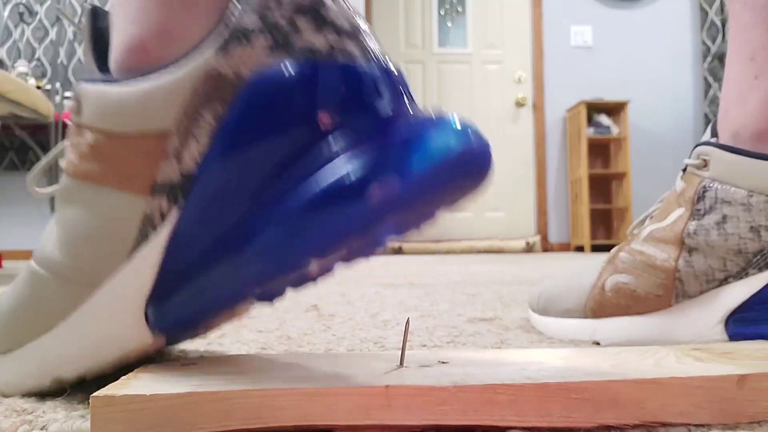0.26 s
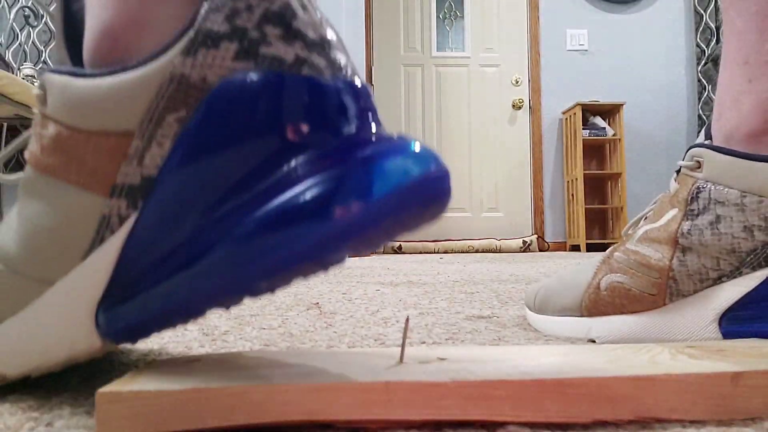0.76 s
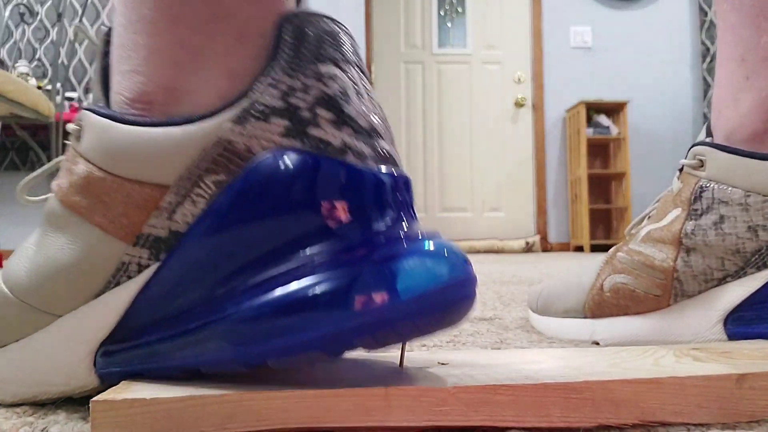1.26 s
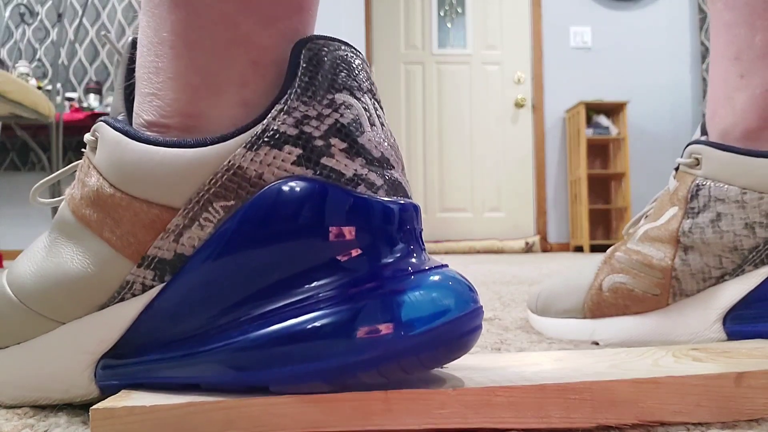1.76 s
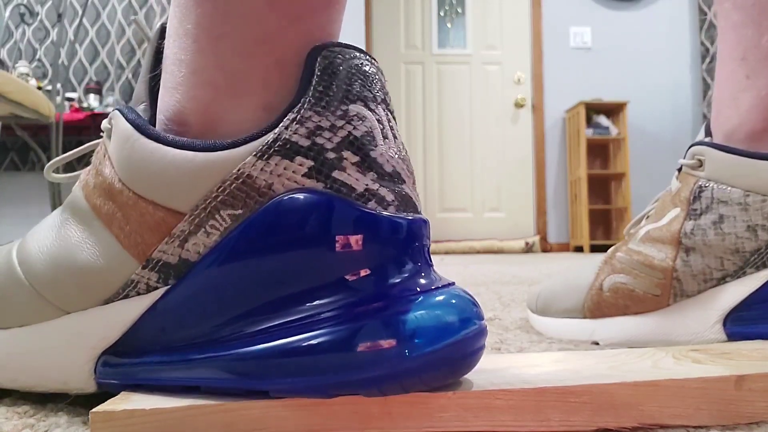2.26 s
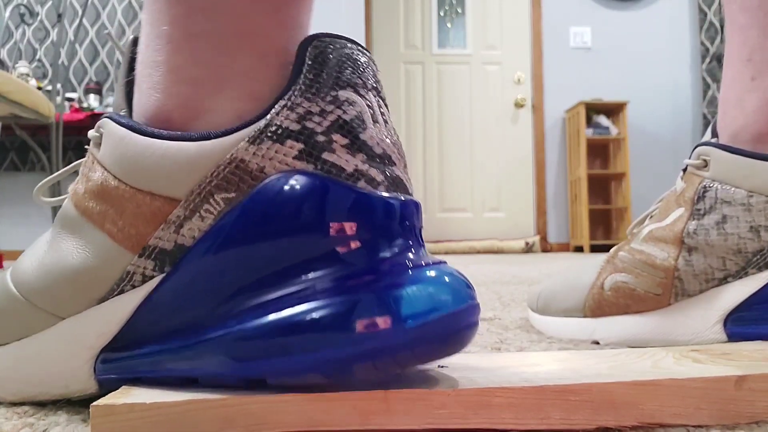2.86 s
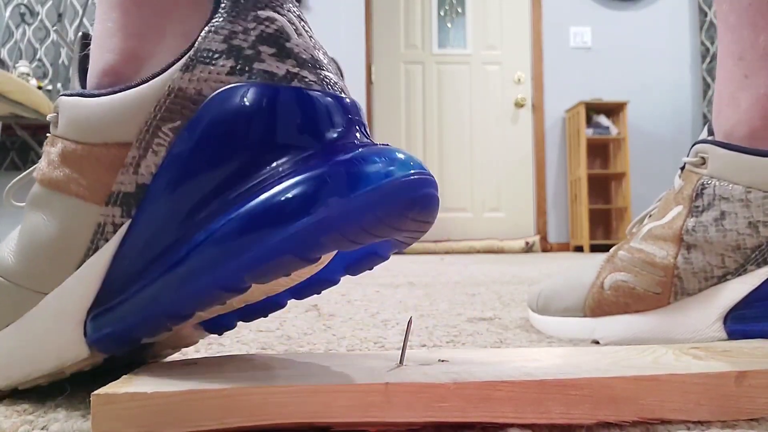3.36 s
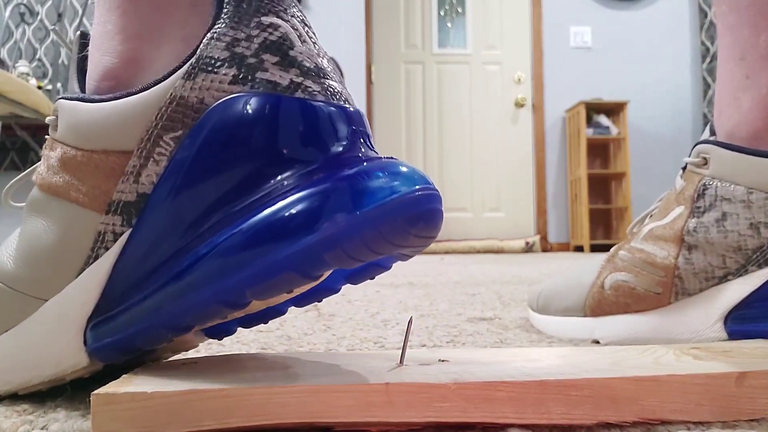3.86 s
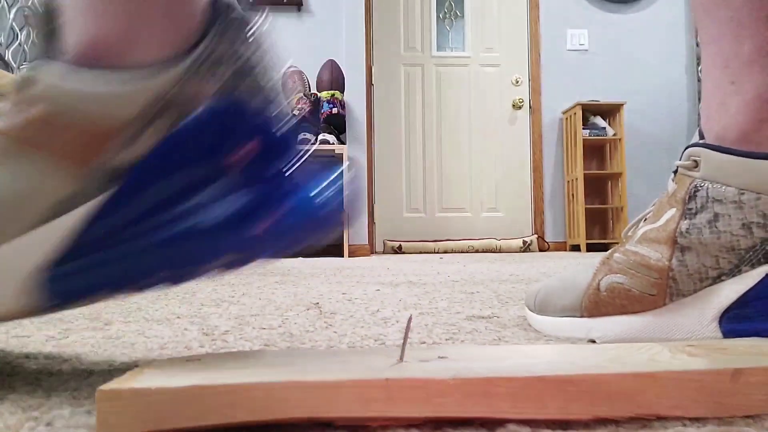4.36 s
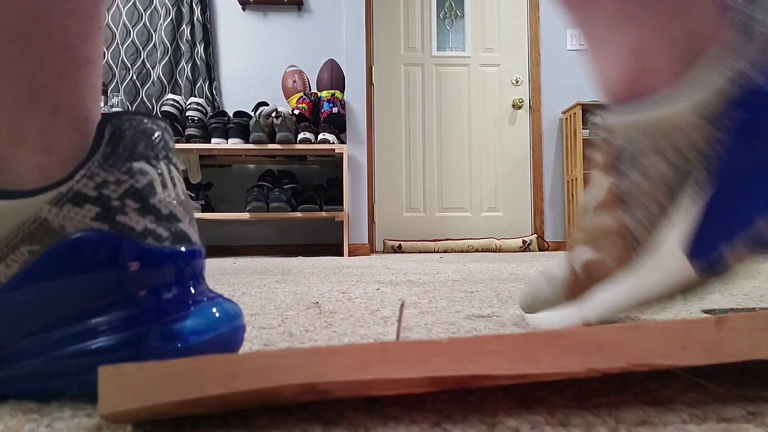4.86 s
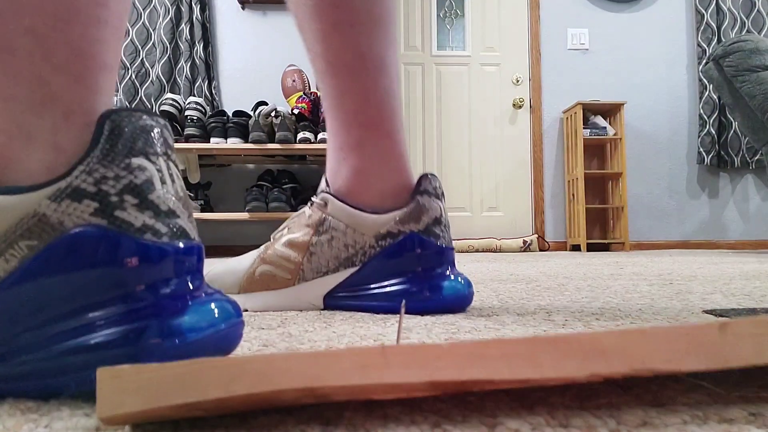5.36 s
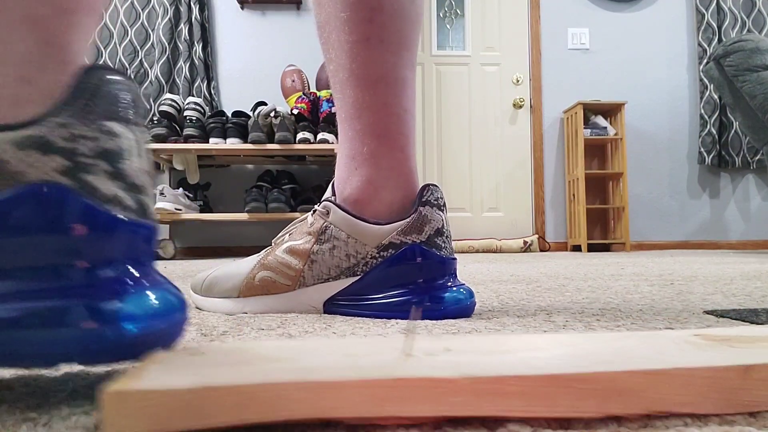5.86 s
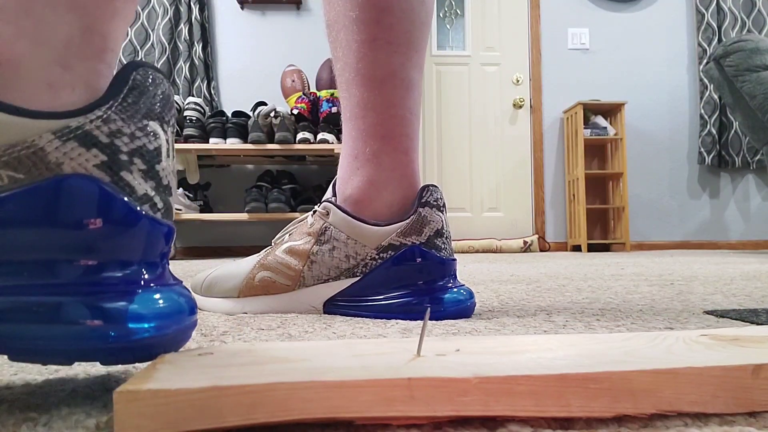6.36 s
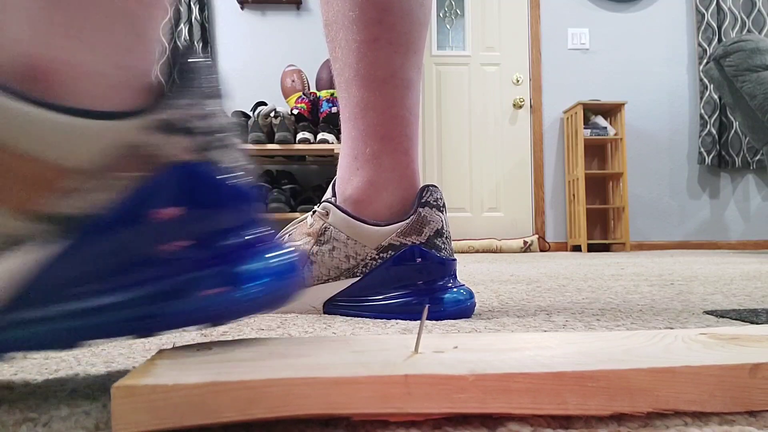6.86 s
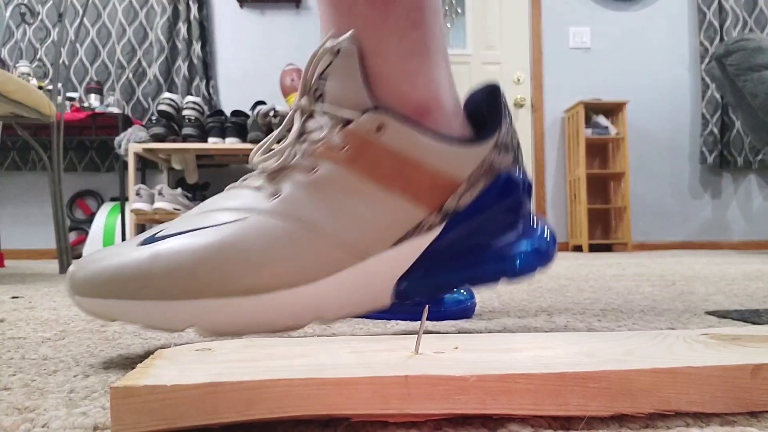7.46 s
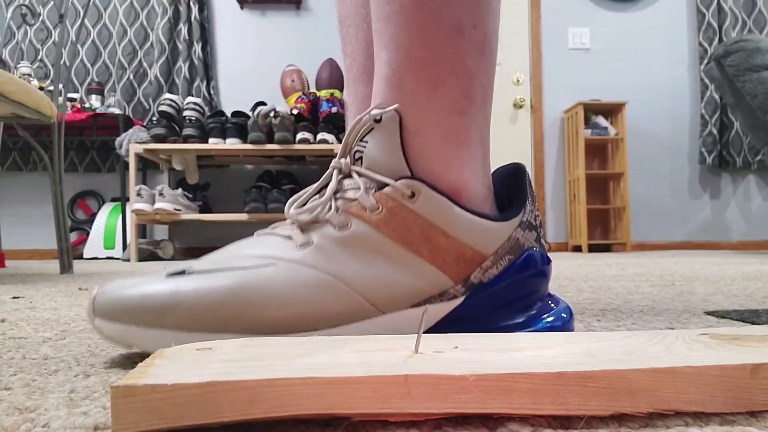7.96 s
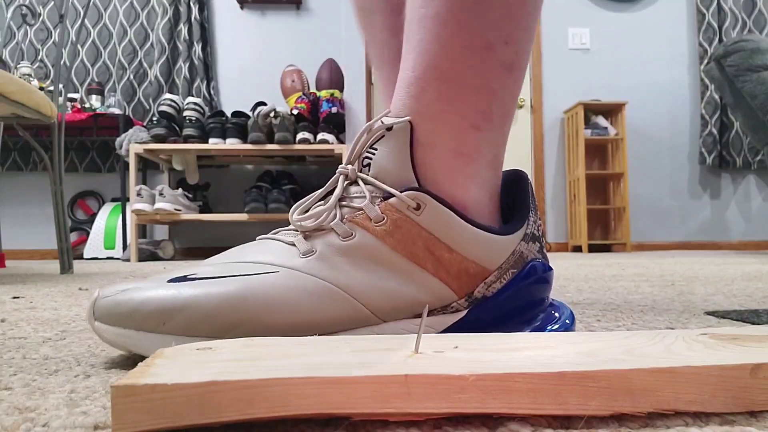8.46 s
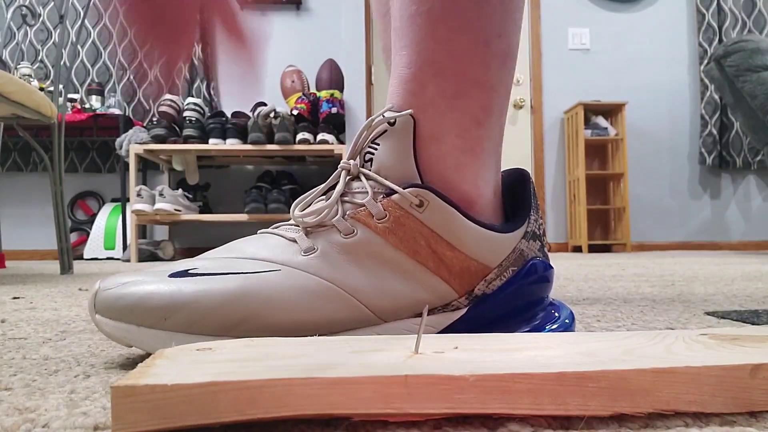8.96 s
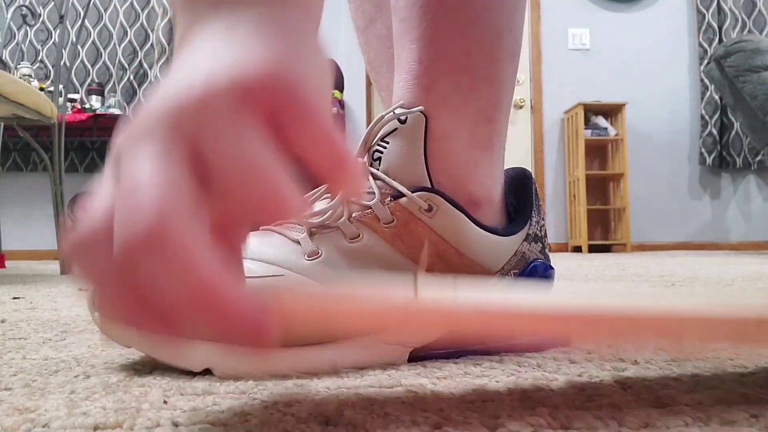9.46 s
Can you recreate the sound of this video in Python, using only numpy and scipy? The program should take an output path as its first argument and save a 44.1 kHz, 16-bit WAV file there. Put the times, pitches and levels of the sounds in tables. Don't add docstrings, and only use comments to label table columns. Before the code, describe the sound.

Soft heel thumps and faint rubber brushing, then a sudden dry wood crack with a brief flutter of air. After a lull, clustered knocks, tread ticks and grainy carpet scrapes mark several steps, with dull floor booms beneath. Isolated taps lead to a final, sharper crack and a tumbling burst of clacks. Stereo phone microphone a hand's width away, in a short-echo room with low hiss.

```python
import sys
import numpy as np
from scipy import signal
from scipy.fft import rfft, irfft, next_fast_len
from scipy.io import wavfile
from scipy.ndimage import uniform_filter1d

SR = 44100
rng = np.random.default_rng(int(sys.argv[2]) if len(sys.argv) > 2 else 0)


def gain_from_db(level_db):
    decades = np.asarray(level_db, float) / 20
    return 10 ** decades


def wrap_up_sound(samples):
    columns = np.atleast_2d(samples).T
    tamed = np.clip(columns, -1, 1)
    steps = np.round(tamed * 32767).astype(np.int16)
    wavfile.write(sys.argv[1], SR, steps)


N = 428652

# time in [s], blow in [dB], floor thud in [dB], pan in [dB].
HEEL_THUMPS = [
    (.47, -58, 18, 18),
    (1.027, -72, 27, -6),
    (1.36, -70, 12.5, 7),
    (3.058, -44, -4, 4.5),
    (4.368, -49, -5, 15),
    (5.584, -41.5, -5.5, -27),
    (7.823, -58, -13, -0.5),
    (8.289, -65.5, 12.5, -3),
    (9.308, -55, -11, -1),
]
# time in [s], blow in [dB], board ring in [Hz], floor thud in [dB], pan in [dB].
TOE_TAPS = [(4.726, -40.5, 366, 3, 11.5), (4.776, -47.5, 350, -2.5, 6), (5.038, -59, 866, 2, -1.5),
            (5.222, -42.5, 498, -7.5, 5), (5.455, -52, 612, 5.5, 6), (5.572, -41, 497, 3, 17),
            (5.89, -39, 426, -5, 5), (8.039, -33.5, 355.4, -14.5, 4.5), (8.733, -39.5, 430, -8.5, 5),
            (8.949, -39.5, 361, -14.5, -4), (9.16, -41, 444, -6, 4)]
# time in [s], blow in [dB], board ring in [Hz],
# hardness in [dB], pan in [dB].
EDGE_CLACKS = [(.493, -55.5, 920, -5, 19), (0.313, -53.5, 425, 2.5, 6), (3.073, -50.5, 435, -8, 18),
               (3.091, -66, 420, 10, 6), (4.615, -51, 394, 0, 10.5), (4.759, -60, 600, 1, 13),
               (4.795, -56, 615, -9, 10), (4.822, -42.5, 370, -22, 4.5), (4.892, -49.5, 810, -14, 5),
               (4.929, -57, 691, -6, -3), (5.564, -62, 878, -14, 10), (5.6878, -51, 595, 2, 9),
               (5.721, -63, 894, -17.5, 8), (5.988, -42.5, 408.4, -18, -1), (9.397, -49.5, 418, 2, 10),
               (9.456, -42, 517, -15, 3), (5.489, -52, 570, -9, 10.5), (5.597, -37.5, 580, -7, 12),
               (5.611, -39.5, 340, -6, 2), (5.683, -42, 350, -22, 15), (6.274, -74, 896, 5, 3.5),
               (6.292, -69, 900, 5, 3), (6.301, -66, 790, 7, 6.5), (6.329, -59, 960, 4.5, 8),
               (6.364, -61, 830, -11.5, -0.5), (6.405, -67.5, 902, 5, 9), (6.756, -67, 700, 6.5, 9),
               (6.778, -66.5, 720, 5, 15.5), (6.788, -58.5, 813, 0, 7), (.447, -59, 400, -10, 10),
               (6.799, -48.5, 506, -6, 5), (9.464, -35.5, 614.5, -25, 3), (9.474, -27.5, 326, -9, 1.5),
               (9.479, -27, 622, -2.5, 5.5), (9.491, -30, 544, -3, 1), (9.513, -32.5, 516, -1, -1),
               (9.612, -48.5, 360, -3, 2)]
# pitch in [Hz], level in [dB], t60 in [s].
CONTACT_MODES = [(1392, -2.5, 0.0056), (1648, -0.5, 0.011), (2220, 9, 0.0035), (2830, -7.5, 0.013),
                 (3480, -12.5, 0.009)]
# pitch in [Hz], level in [dB], t60 in [s].
FLOOR_MODES = [(122.2, -4.5, 0.19), (177.4, 2, 0.079), (267.6, 3, 0.031)]
# time in [s], peak in [dB], contact in [ms], pan in [dB].
BOARD_CRACKS = [
    (2.1791, -9.5, 2.01, 7),
    (3.101, -25, 1.32, 9.5),
    (4.855, -17.5, 1, 6.5),
    (9.2007, -1.5, 0.878, 5),
]
# pitch in [Hz], level in [dB], t60 in [s].
HEEL_CRACK_MODES = [(120, -29, 0.067), (178, -15, 0.098), (334, -21, 0.019), (560, -11.5, .015),
                    (930, 7.5, 0.0046), (1325, -1, 0.0084), (1680, -7, 0.0077), (3000, -15, 0.006),
                    (3300, -17.5, 0.0095), (4308, -26.5, .008)]
LIFT_CRACK_MODES = [(115, -12, 0.057), (207, -14.5, 0.053), (330, 7, 0.013), (681, 0.5, 0.009),
                    (1105, -12.5, 0.01), (1530, 4.5, 0.0068), (2280, -6, 0.0058), (3250, -16, 0.023)]
TIP_CRACK_MODES = [(178, -20.5, 0.15), (388, 9, 0.012), (1630, -3, 0.016), (2110, -12.5, 0.034),
                   (2800, 0, 0.0093), (3050, 2, 0.018), (4860, -6.5, 0.009), (5850, -17, 0.004)]
GRAB_CRACK_MODES = [(72.7, -34, 0.15), (135.6, -31, 0.14), (216, -14, 0.023), (350, -0.5, 0.0084),
                    (641, 5, 0.0058), (1022, 2.5, 0.0044), (1487, -2, 0.0038), (2205, -5.5, 0.0035),
                    (2510, -31.5, 0.02), (2900, -28, 0.013)]
# time in [s], peak in [dB], pan in [dB].
TREAD_TICKS = [(2.9282, -67, 13.5), (5.5406, -54, 13.5), (5.5634, -55.5, 22.5), (5.63, -49.5, 8.5),
               (5.964, -51, 0), (5.9912, -48, 1.5), (6.3292, -50, 0), (6.789, -55.5, 1.5),
               (9.4588, -43.5, 2), (9.4664, -52, 4), (9.4705, -52, 4), (5.9492, -57, 0)]
# time in [s], peak in [dB], lower treble in [dB], pan in [dB].
TREAD_SNAPS = [(.3142, -60, -0.5, 12), (2.1797, -29.5, -2.5, 7), (3.0746, -43.5, -7.5, 17),
               (3.102, -39.5, -4.5, 12), (4.8445, -38, -4, 2.5), (4.8558, -22.5, -3, 10),
               (9.6223, -62, -24, -2), (5.5834, -38, -8.5, 7.5), (5.5963, -44.5, 4, 13.5),
               (5.6105, -50, 7.5, 5), (8.8334, -84, 6, 6.5), (9.2006, -36.5, 6.5, 10),
               (9.3227, -49, -20, 0), (9.4914, -29.5, -4, 5.5), (5.6875, -59.5, -12, 8.5),
               (9.4805, -25.5, -35, -0.5), (9.4751, -32, -13, 6), (9.5127, -30, -8, -3)]
# time in [s], peak in [dB], pitch in [Hz], t60 in [s], pan in [dB].
FLOOR_STOMPS = [(2.183, -20, 260, 0.013, 9), (2.206, -36.5, 330, 0.087, 0), (4.731, -31.5, 120, 0.08, -2.5),
                (4.749, -31.5, 116, 0.031, -5), (5.5834, -25, 94, 0.05, -5.5), (5.594, -24, 85, 0.057, -8),
                (5.608, -32, 60, 0.1, 2), (6.806, -37.5, 60, 0.098, -0.5), (6.821, -37.5, 75, .08, -0.5),
                (.499, -34, 84, 0.22, 8.5), (.524, -43, 83.5, 0.05, -5), (2.191, -36, 149.2, .13, 2.5),
                (8.043, -41, 149, 0.082, 4), (9.203, -31.5, 63.4, .15, -5), (9.221, -36.5, 114.5, .1, 1),
                (5.343, -43.5, 74.9, 0.066, -1)]
# start in [s], rise in [ms], fall in [ms], scrape in [dB], pile fizz in [dB].
SOLE_DRAGS = [(.3, 8.7, 410, -77, -81.5), (.45, 24, 160, -79, -80), (1.83, 23, 550, -84.5, -85.5),
              (2.18, 34, 97, -54.5, -69), (2.82, 41, 85, -81, -78), (3.1, 12.5, 83, -63, -71.5),
              (4.27, 97, 97, -67, -74), (4.72, 134, 23, -60, -69.5), (4.855, 12, 162, -60.5, -66),
              (4.998, 36.6, 68, -74.5, -89.5), (5.543, 46.5, 138, -53, -60.5), (5.66, 12, 41, -72, -78),
              (5.923, 42, 74, -53, -59.5), (6.24, 60, 187, -69.5, -71.5), (6.735, 43, 43, -66.5, -79.5),
              (6.783, 8.5, 84, -58, -68), (7.479, 44, 84, -101.5, -74.5), (7.98, 63, 110, -74.5, -71.5),
              (8.95, 54, 120, -78, -88), (9.2, 10, 163, -52, -71), (9.29, 56, 71, -59.5, -67),
              (9.38, 11, 146, -66.5, -99), (9.437, 48, 109, -45.5, -51.5), (9.58, 47, 170, -73, -81)]
# start in [s], rise in [ms], fall in [ms], level in [dB], centre in [Hz], width in [Hz].
BAND_SWISHES = [(0.46, 21, 62, -66.5, 1000, 780), (0.87, 21.3, 130, -74, 380, 340),
                (4.65, 4.5, 11.4, -71.5, 1100, 900), (4.6, 28, 320, -76, 1900, 1100),
                (4.69, 25, 50, -70, 2230, 830), (4.81, 8, 14.5, -55, 1100, 500),
                (4.842, 4, 9.4, -51, 2400, 900), (4.858, 14, 78, -55.5, 2900, 870),
                (4.875, 13, 60, -62, 5100, 1200), (5.224, 8, 42.4, -70, 620, 700),
                (5.89, 8.3, 59, -68, 680, 696), (7.48, 45, 42, -71.5, 5700, 1207),
                (8.041, 5.5, 160, -66.5, 710, 800), (8.737, 6.5, 74, -73, 848, 900),
                (8.831, 3.1, 9.1, -74, 3200, 2100), (4.614, 4.5, 10, -61.5, 1970, 1300),
                (8.825, 9, 98, -79, 3270, 1500), (8.98, 11.7, 87, -80.5, 4000, 2000),
                (8.951, 5.3, 45, -70.5, 800, 804), (9.205, 7.5, 110, -64, 2720, 700),
                (9.31, 25, 110, -62, 3100, 500), (9.315, 16, 110, -65, 4400, 780),
                (9.657, 4, 10, -68, 8600, 2500), (6.314, 4, 10, -70, 7300, 900),
                (5.6, 80, 90, -74.5, 5800, 2700), (5.94, 15, 60, -61, 4900, 1200),
                (2.21, 20, 70, -63, 4900, 2000), (9.204, 5, 25, -54.5, 2700, 900),
                (9.388, 10, 11, -55, 3280, 1700)]
# start in [s], rise in [ms], fall in [ms], # level in [dB], flutter
# (spacing of the bands) in [Hz].
CRACK_WAKES = [
    (2.182, 25, 95, -51.5, 970),
    (3.103, 8.8, 105, -63, 1420),
]
# time in [s], effort in [dB], pan in [dB].
RUSTLE_EFFORT = [(0.0, -92, 1), (0.38, -90.5, 12), (1.8, -86.5, 11.5), (2.08, -84.5, 20.5), (2.4, -95, 8),
                 (3.03, -87, 22), (4.14, -91, 0), (4.84, -72, 9.5), (5.17, -88, 6.5), (7.88, -88, 4),
                 (8.01, -79.5, 14), (8.55, -88.5, 3), (9.3, -72.5, 7), (9.72, -79.5, -0.5)]
# frequency in [Hz], density in [dB per Hz].
ROCK_COLOUR = [(59, -30.5), (100, -2), (183, -6), (237, -2), (295, -10.5), (323, -14), (700, -28),
               (910, -59), (1540, -120)]
SCRAPE_COLOUR = [(260, -30), (450, 0.5), (712, -7), (827, -5), (1110, -9), (1240, -8.5), (2640, -13.5),
                 (3030, -13.5), (7000, -27.5), (9100, -56), (15400, -120)]
FIZZ_COLOUR = [(3820, -41.5), (6500, -15), (7460, -27.5), (8140, -12.5), (10500, -8), (14100, -2.5),
               (15000, -5), (15500, -47.5)]
WAKE_COLOUR = [(300, -11.5), (800, -1), (1800, -8), (2400, -11.5), (3200, -4), (5200, -11), (7800, -20),
               (11000, -18)]
# time in [s], load in [dB], then build-up in [ms] and
# settling in [ms] for a change of 20 dB.
WEIGHT_SHIFTS = [(.4, -53.5, 190, 120), (.51, -42.5, 57, 140), (1.05, -59, 560, 240), (1.38, -57.5, 25, 88),
                 (1.69, -59, 210, 900), (2.192, -49, 25, 230), (2.62, -61, 230, 300), (2.95, -56, 98, 240),
                 (3.11, -51.5, 166, 280), (4.22, -61, 225, 720), (4.39, -51.5, 106, 94),
                 (4.735, -46, 75, 62), (4.841, -46, 30, 210), (5.25, -52.5, 140, 70),
                 (5.36, -53.5, 82, 1170), (5.6, -37.5, 29, 52), (5.929, -37.5, 26, 74),
                 (6.01, -56.5, 51, 50), (6.84, -44, 42, 94), (6.98, -59.5, 124, 166), (7.31, -62, 65, 180),
                 (7.6, -63.5, 49.5, 225), (7.85, -54.5, 110, 62), (8.04, -47.5, 132, 200),
                 (8.28, -53.5, 285, 127), (8.74, -54.5, 222, 160), (8.961, -53, 45, 90),
                 (9.21, -32, 24, 89), (9.34, -46, 51, 40), (9.5, -35, 52, 30)]
# time in [s], pan in [dB].
WEIGHT_LEAN = [(0.0, -14), (0.43, -1), (1.92, -1), (2.06, -6), (2.17, 8.5), (2.49, -2.5), (4.87, 0.5),
               (7.93, -6.5), (8.23, 2.5), (8.44, -6.5), (9.12, 0.5), (9.72, -1)]
# frequency in [Hz], t60 in [s].
ROOM_T60 = [(100, 0.64), (300, 0.33), (1000, 0.12), (3000, 0.1), (8000, 0.027), (14000, 0.068)]
# frequency in [Hz], correlation in [0 to 1].
PORT_LIKENESS = [(60, 0.87), (180, 0.44), (550, 0.36), (1650, 0.02), (15000, 0.04)]
# frequency in [Hz], left lead in [radians].
PORT_PHASE = [(20, 0), (65, -.3), (125, .65), (250, .15), (500, .4), (1000, .15), (2000, 0)]
# frequency in [Hz], density in [dB per Hz].
HISS_COLOUR = [(18, -30), (30, -4), (97, -1), (158, -4), (240, -5), (404, -17), (629, -21.5), (1440, -25.5),
               (3500, -27.5), (7630, -38.5), (11000, -32), (13900, -33.5), (15000, -44)]
# pitch in [Hz], width in [Hz], level in [dB].
MAINS_HUM = [(127, 2.3, -82.5), (231.5, 1.2, -84)]


def knock(db, hz, hard_db, thud_db, pan_db):
    t = np.arange(8000) / SR
    push = np.hanning(int(0.5 * SR / hz) + 2)[1:]
    build = np.minimum(0.29 + t * hz / 0.8, 1)
    body = ring([(hz, 0, 0.025), (hz * 1.6, -4, 0.02), (hz * 0.6, -8, 0.03)], t, 0.018)
    body = peaked(np.convolve(body, push)[:len(t)] * build)
    body += gain_from_db(-18.5) * ring([(1470, 0, 0.0093)], t, 0.08) * t / (t + 0.00049)
    hard = ring(CONTACT_MODES, t, 0.12) * (t / 0.0007) ** 2 / (1 + (t / 0.0013) ** 2)
    thud = ring(FLOOR_MODES, t, 0.011) * (1 - np.exp(-t / 0.0045))
    near = -sides(pan_db)[:, None] * (body + gain_from_db(hard_db - 6.5) * peaked(hard))
    below = gain_from_db(thud_db + 7) * thud * sides(0.28 * pan_db)[:, None]
    return gain_from_db(db + 3) * (near - below)


def crack(db, contact_ms, pan_db, modes):
    t = np.arange(12000) / SR
    before = np.arange(int(contact_ms * SR / 1000), -1, -1)
    jolts = (before % 46 == 0) * 0.5 ** (before / 46)
    both = np.zeros((2, len(t)))
    for hz, mode_db, t60 in modes:
        near = np.clip(hz / 600, 0, 1)
        swell = 1 - np.exp(-t * hz)
        tone = gain_from_db(mode_db - 60 * t / t60) * np.sin(2 * np.pi * hz * t)
        both += tone * swell * sides(near * pan_db)[:, None]
    blow = np.convolve(jolts, np.hanning(7))
    return -gain_from_db(db) * peaked(signal.oaconvolve(both, blow[None], axes=1))


def tick(db, low_db, pan_db):
    t = np.arange(800) / SR
    decay = np.exp(-t / 0.00093) + 0.036 * np.exp(-t / 0.0065)
    snap = rng.standard_normal((2, len(t))) * t / (t + 0.00091) * decay
    snap[:, 20] += 0.97
    alike = 0.073
    snap[1] = alike * snap[0] + np.sqrt(1 - alike ** 2) * snap[1]
    high = signal.sosfilt(signal.butter(4, 12000, "high", fs=SR, output="sos"), snap)
    low = signal.sosfilt(signal.butter(2, (4800, 11000), "band", fs=SR, output="sos"), snap)
    return gain_from_db(db + 14.5) * sides(pan_db)[:, None] * (peaked(high) - gain_from_db(low_db - 8.5) * peaked(low))


def stomp(db, hz, t60, pan_db):
    t = np.arange(12000) / SR
    return -sides(pan_db)[:, None] * gain_from_db(db - 60 * t / t60) * np.sin(2 * np.pi * hz * t)


def foot_hits():
    knocks = [(s, db, 360, -8.5, thud, pan) for s, db, thud, pan in HEEL_THUMPS]
    knocks += [(s, db, hz, -37.5, thud, pan) for s, db, hz, thud, pan in TOE_TAPS]
    knocks += [(s, db, hz, hard, -23, pan) for s, db, hz, hard, pan in EDGE_CLACKS]
    ticks = [(s, db, -38, pan) for s, db, pan in TREAD_TICKS] + list(TREAD_SNAPS)
    boards = HEEL_CRACK_MODES, LIFT_CRACK_MODES, TIP_CRACK_MODES, GRAB_CRACK_MODES
    hits = [(s + 0.0008, farther(knock(*row), row[-1]), gain_from_db(-13.5)) for s, *row in knocks]
    for (s, *row), modes in zip(BOARD_CRACKS, boards):
        hits.append((s, farther(crack(*row, modes), row[-1]), gain_from_db(-20)))
    hits += [(s + 0.00067, tick(*row), gain_from_db(-20.5)) for s, *row in ticks]
    hits += [(s, stomp(*row), gain_from_db(-20)) for s, *row in FLOOR_STOMPS]
    return hits


def shuffle(load_db):
    rock = noise(ROCK_COLOUR, grain_db=2.5)
    scrape = patchy(noise(SCRAPE_COLOUR, grain_db=2.5), patch_db=2.2)
    fizz = noise(FIZZ_COLOUR, grain_db=2)
    lean_db = uniform_filter1d(np.minimum(load_db, -51), int(0.06 * SR))
    out = gain_from_db(-67 + 0.65 * (lean_db + 60)) * rock
    out += gain_from_db(curve(RUSTLE_EFFORT, 1) - 1) * sides(curve(RUSTLE_EFFORT, 2)) * fizz
    for start, rise_ms, fall_ms, scrape_db, fizz_db in SOLE_DRAGS:
        first = round(start * SR)
        shape = bump(rise_ms / 1000, fall_ms / 1000)[:N - first]
        span = slice(first, first + len(shape))
        drag = gain_from_db(scrape_db) * scrape[:, span] + gain_from_db(fizz_db) * fizz[:, span]
        nudge = gain_from_db(min(scrape_db, -58) - 2.5) * rock[:, span]
        add(out, start, (drag * sides(5.5)[:, None] + nudge) * shape)
    air = patchy(noise([(20, 0), (20000, 0)], grain_db=1.5), patch_db=1.2)
    for start, *row in CRACK_WAKES:
        add(out, start, wake(*row, air[:, round(start * SR):][:, :32768]))
    for start, *row in BAND_SWISHES:
        add(out, start, swish(*row, air[:, round(start * SR):]))
    return out


def wake(rise_ms, fall_ms, db, flutter_hz, air):
    shape = bump(rise_ms / 1000, fall_ms / 1000)
    hz = np.fft.rfftfreq(air.shape[1], 1 / SR)
    comb = gain_from_db(read(WAKE_COLOUR, hz)) / abs(1 - 0.33 * np.exp(-2j * np.pi * hz / flutter_hz))
    hiss = evened(irfft(rfft(air) * comb))[:, :len(shape)]
    return gain_from_db(db) * shape * sides(5)[:, None] * hiss


def swish(rise_ms, fall_ms, db, hz, width, air):
    shape = bump(rise_ms / 1000, fall_ms / 1000)
    band = resonate(resonate(air[:, :len(shape)], hz, width), hz, width)
    return gain_from_db(db) * shape * evened(band)


def load():
    t = np.arange(0, N + 64, 64) / SR
    power = gain_from_db(2 * -82.5)
    for s, db, rise_ms, fall_ms in WEIGHT_SHIFTS:
        away = np.where(t < s, (s - t) / rise_ms, (t - s) / fall_ms) * 1000
        sway_db = min(db, -50) - 18.5 - 20 * abs(t - s) / 0.9
        power = power + gain_from_db(2 * (db - 20 * away)) + gain_from_db(2 * sway_db)
    return np.interp(np.arange(N) / SR, t, 10 * np.log10(power))


def floor_boom(load_db):
    shake = noise([(20, -14), (45, 0.5), (150, -1.5), (400, -31)])
    hz = 53 + 24 * np.clip((load_db + 56.5) / 18, 0, 1)
    boom = evened(resonate(resonate(shake, hz, 38), hz, 38))
    return gain_from_db(load_db) * sides(curve(WEIGHT_LEAN, 1)) * boom


def room():
    taps = np.zeros((2, SR // 2))
    slots = np.arange(200, SR // 2 - 20, 20)
    at = slots + rng.integers(0, 20, (2, len(slots)))
    np.put_along_axis(taps, at, rng.choice([-1., 1.], at.shape), 1)
    hz, t, z = signal.stft(taps, SR, nperseg=256)
    fade = gain_from_db(-60 * t / read(ROOM_T60, hz)[:, None])
    tail = signal.istft(z * fade, SR, nperseg=256)[1]
    return tail / np.linalg.norm(tail[0])


def house():
    white = noise([(20, 0.0035), (20000, 0.014)])
    hum = sum(gain_from_db(db) * evened(resonate(white, hz, width)) for hz, width, db in MAINS_HUM)
    return gain_from_db(-72.5) * noise(HISS_COLOUR) + hum


def ring(modes, t, spread):
    total = 0
    for hz, db, t60 in modes:
        tuned = hz * (1 + spread * rng.standard_normal())
        total = total + gain_from_db(db - 60 * t / t60) * np.sin(2 * np.pi * tuned * t)
    return peaked(total)


def noise(spectrum, grain_db=0):
    hz = np.fft.rfftfreq(N, 1 / SR)
    sizes = np.minimum(rng.exponential(1, N // 64 + 1), 4)
    slips = np.interp(np.arange(N) / 64, np.arange(N // 64 + 1), sizes)
    a, b = rfft(rng.standard_normal((2, N)) * gain_from_db(grain_db * slips))
    same = read(PORT_LIKENESS, hz)
    both = np.array([a, same * a + np.sqrt(1 - same ** 2) * b])
    return evened(irfft(both * gain_from_db(read(spectrum, hz)), N))


def patchy(x, patch_db):
    z = signal.stft(x, nperseg=256)[2]
    field = uniform_filter1d(rng.standard_normal(z.shape[1:]), size=4, axis=0)
    field = evened(uniform_filter1d(field, size=6, axis=1))
    return evened(signal.istft(z * gain_from_db(patch_db * field), nperseg=256)[1][:, :N])


def resonate(x, hz, width):
    turn = np.exp(2j * np.pi * np.cumsum(hz * np.ones(x.shape[-1])) / SR)
    r = np.exp(-np.pi * width / SR)
    return 2 * (turn * signal.lfilter([1 - r], [1, -r], x * turn.conj())).real


def bump(rise, fall):
    rise, fall = max(rise, 0.004), max(fall, 0.01)
    t = np.arange(int((rise + fall * np.pi) * SR)) / SR
    swell = np.sin(np.pi / 2 * np.clip(t / rise, 0, 1)) ** 3
    return swell * np.exp(-(np.maximum(t - rise, 0) / fall * 2) ** 1.4)


def farther(sound, pan_db):
    lag = int(np.clip(0.7 * pan_db, -6, 6))
    return np.array([np.roll(sound[0], max(-lag, 0)), np.roll(sound[1], max(lag, 0))])


def sides(pan_db):
    return gain_from_db(np.array([pan_db / 2, -pan_db / 2]))


def evened(x):
    return x / np.sqrt(np.mean(x ** 2) + 1e-30)


def peaked(x):
    return x / abs(x).max()


def read(points, hz):
    f, value = np.transpose(points)
    return np.interp(np.log(hz + 1), np.log(f + 1), value)


def curve(rows, index):
    rows = np.array(rows)
    return np.interp(np.arange(N) / SR, rows[:, 0], rows[:, index])


def add(mix, s, sound):
    part = mix[:, round(s * SR):][:, :sound.shape[1]]
    part += sound[:, :part.shape[1]]


def scene():
    load_db = load()
    mix = shuffle(load_db) + floor_boom(load_db) + house()
    echoes = [room(), room(), room()]
    spots = np.zeros((len(echoes), 1, N))
    for k, (s, sound, wet) in enumerate(foot_hits()):
        add(mix, s, sound)
        add(spots[k % len(echoes)], s, wet * sound.mean(0)[None])
    return mix + sum(signal.oaconvolve(x, echo, axes=1)[:, :N] for x, echo in zip(spots, echoes))


def low_pass(x):
    return signal.sosfilt(signal.butter(12, 15960, fs=SR, output="sos"), x)


def record(dry):
    size = next_fast_len(N)
    lead = read(PORT_PHASE, np.fft.rfftfreq(size, 1 / SR)) * np.array([[0.5], [-0.5]])
    ports = irfft(rfft(dry, size) * np.exp(1j * lead), size)[:, :N]
    limit = 0.97
    rounded = limit * np.tanh(ports / limit)
    cut = signal.sosfilt(signal.butter(2, 40, "high", fs=SR, output="sos"), rounded)
    below = signal.oaconvolve(cut, signal.firwin(255, 14600, fs=SR)[None], "same", axes=1)
    return low_pass(below + gain_from_db(-24.5) * (cut - below))


dry = scene()
out = record(dry)
wrap_up_sound(out)
```